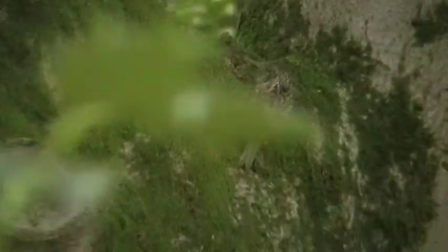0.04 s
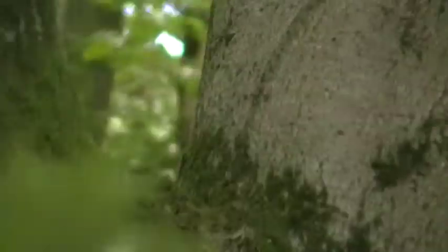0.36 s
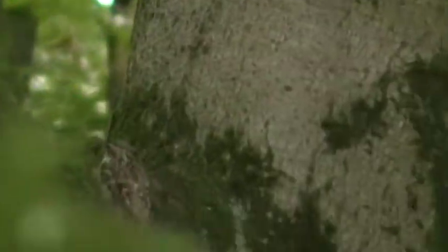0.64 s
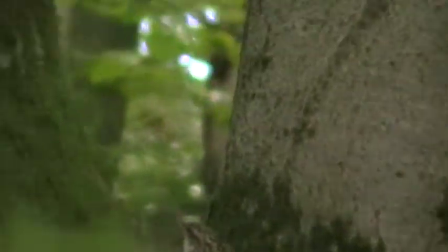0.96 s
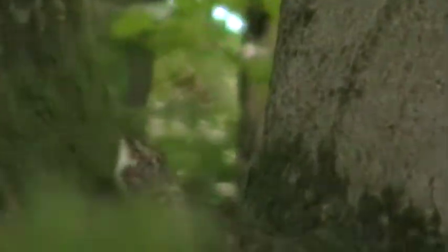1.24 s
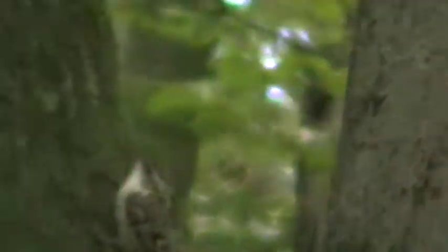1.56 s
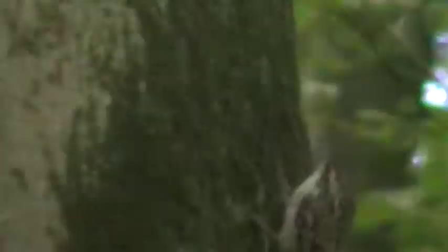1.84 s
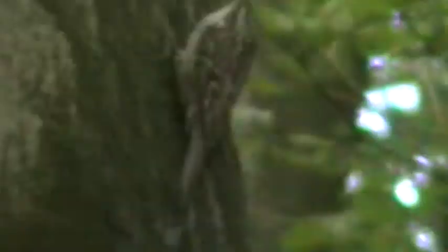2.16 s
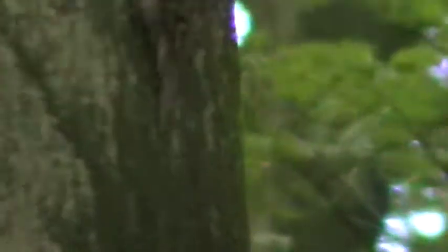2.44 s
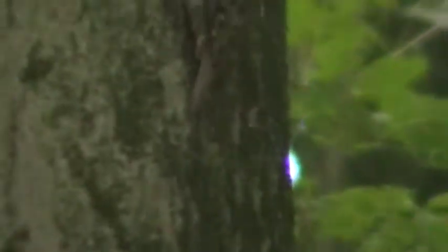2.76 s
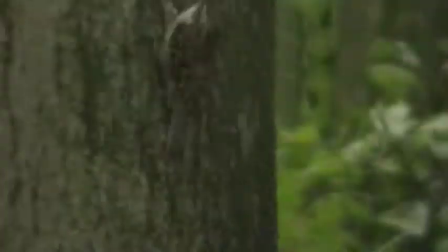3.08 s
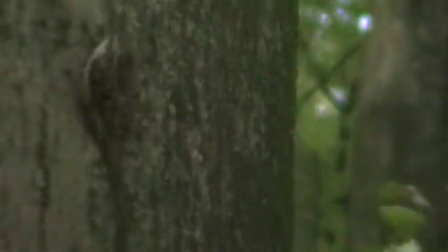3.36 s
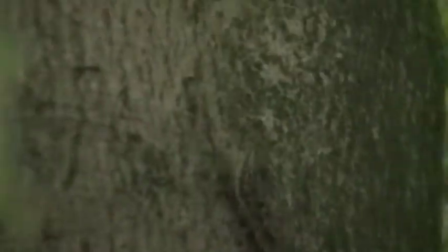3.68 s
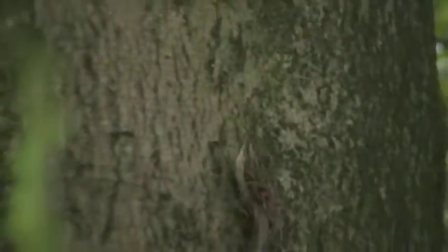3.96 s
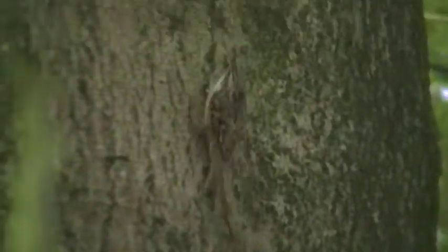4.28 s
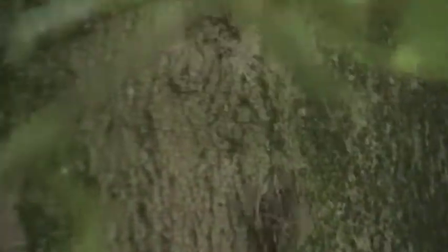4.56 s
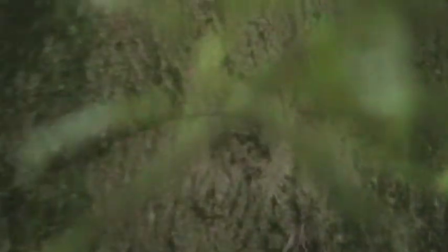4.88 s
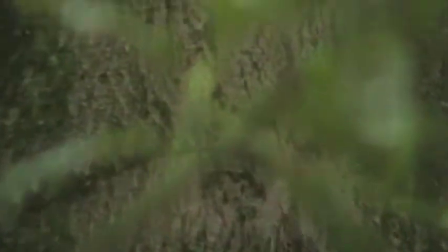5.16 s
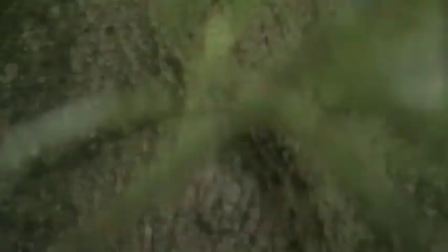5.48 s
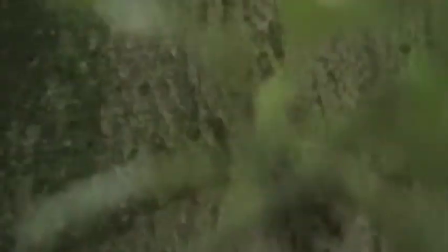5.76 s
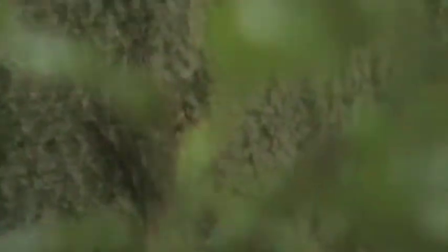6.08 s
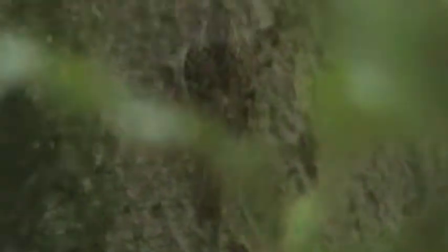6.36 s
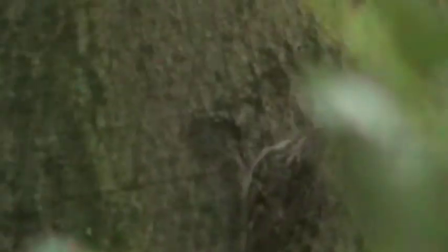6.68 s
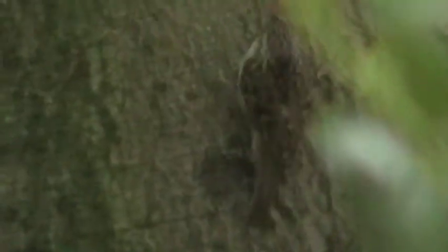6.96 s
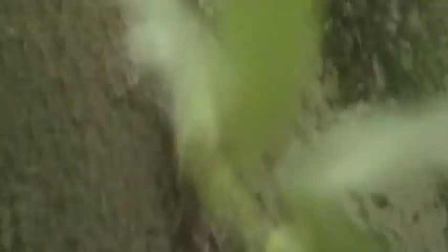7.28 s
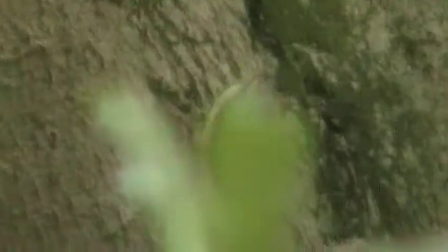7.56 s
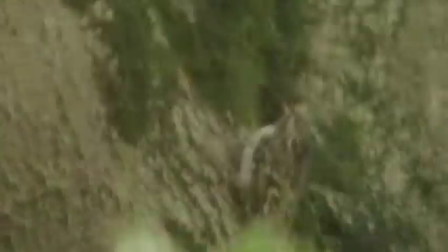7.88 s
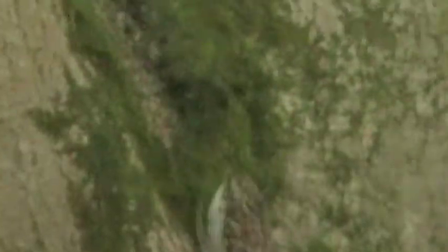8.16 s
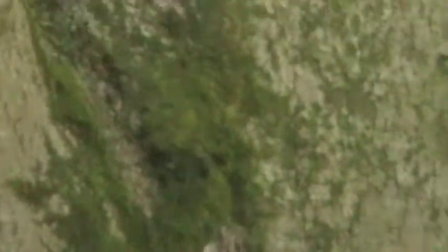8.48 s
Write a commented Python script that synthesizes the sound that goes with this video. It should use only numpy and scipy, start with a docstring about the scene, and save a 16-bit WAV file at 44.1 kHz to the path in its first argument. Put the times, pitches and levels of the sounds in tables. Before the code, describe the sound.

Plastic clicks from a hand-held camera and two short, high, warbling treecreeper calls sound over quiet woodland hiss.

```python
"""A wood: a treecreeper climbs a trunk and gives two thin, warbling calls near 7 kHz.
Trunks throw each call back and foliage smears it into a tail, over a distant rumble, a brief far tone,
steady hiss and settling leaves. A hand-held camera hums faintly; fingers rub and knock it,
and its plastic case clicks, ringing in its modes. A brief rasp leads into each loud snap."""
import sys
import numpy as np
from scipy import signal
from scipy.fft import rfft, irfft
from scipy.io import wavfile
from scipy.ndimage import uniform_filter1d

SR = 44100
rng = np.random.default_rng(int(sys.argv[2]) if len(sys.argv) > 2 else 0)


def transcribe(signal):
    """Save signal, clipped to [-1, 1], as a 16-bit WAV file at the path in sys.argv[1]."""
    frames = np.atleast_2d(signal).T
    limited = np.clip(frames, -1, 1)
    pcm = np.round(limited * 32767).astype(np.int16)
    wavfile.write(sys.argv[1], SR, pcm)


N = 380583


def whistle(length_s, base_hz, climb_hz_per_s, arch_hz, level_db, peak_s, fall_db,
            arch_s=0.042, shrink_s=0.112, attack_s=0.0035, release_s=0.0092, overtone_db=-41):
    """Syrinx: near-pure tone in shrinking pitch arches; complex, so each path can turn its phase."""
    t = np.arange(0, length_s, 1 / SR)
    angle = np.pi * t / arch_s
    arch = np.abs(np.sin(angle))
    head_start_hz = 800 * np.exp(-t / 0.00754)  # first arch starts part-way up
    pitch_hz = base_hz + climb_hz_per_s * t + arch_hz * np.exp(-t / shrink_s) * arch + head_start_hz
    tone = np.exp(2j * np.pi * np.cumsum(uniform_filter1d(pitch_hz, size=120)) / SR)
    swell_db = np.interp(t, [0, peak_s, length_s], [-9.5, 0, fall_db])
    warble_db = -3.5 * (1 - arch) - 3 * np.sin(2 * angle)  # dips between arches, louder on falling sides
    gate = np.minimum(t / attack_s, 1) * np.minimum((length_s - t) / release_s, 1)
    return np.sqrt(2) * gate * amp(level_db + swell_db + warble_db) * (tone + amp(overtone_db) * tone ** 2)


def treecreeper(call, echoes, direct_db, scatter_db, scatter, lead_rad=0.33, rough=0.3, bark_s=0.0023):
    """One call arrives directly, off the rough bark of single trunks, and through the foliage."""
    start_s, tone, out = call[0], whistle(*call[1:]), np.zeros((2, N))
    mics = np.exp(1j * np.array([[lead_rad], [0]]))  # left is reached sooner
    add(out, start_s, amp(direct_db) * panned(0.8) * (mics * tone).real)
    t = np.arange(SR // 50) / SR
    for delay_s, db, balance_db in echoes:
        smear = rng.standard_normal(len(t)) * np.exp(-t / bark_s)
        trunk = rough * smear / np.linalg.norm(smear) + (t == 0)
        echo = (mics * signal.fftconvolve(tone, trunk)).real
        add(out, start_s + delay_s, amp(db) * panned(balance_db) * echo)
    add(out, start_s, amp(scatter_db) * signal.fftconvolve(tone.real[None], scatter, axes=1))
    return out


def foliage(build_s, hold_s, t60_s, late_db, late_t60_s, spread):
    """Impulse response: scatter off leaves and twigs builds, holds and dies; the deeper wood adds a tail."""
    t = np.arange(SR) / SR
    near = np.minimum(t / build_s, 1) * amp(-60 * np.maximum(t - hold_s, 0) / t60_s)
    far = amp(late_db - 60 * t / late_t60_s) * np.minimum(t / hold_s, 1)
    ahead, around, deep = rng.standard_normal((3, 2, SR))
    return (near * (ahead[0] + spread * around) + far * deep) / np.linalg.norm(near)


def case_ring(t):
    """Spectrum of the plastic case's response to one sharp tap."""
    # case modes: f/Hz, level/dB, t60/s
    modes = [(590, -28, 0.046), (950, -18, 0.009), (1223, -19, 0.021), (1690, -12, 0.0045),
             (2164, -12.5, 0.01), (2490, -11, 0.0078), (3770, -2, 0.0028), (4930, -11, 0.0063),
             (5700, -13, 0.0037), (7640, -8.5, 0.0024), (8760, -11, 0.0037), (11100, -15.5, 0.005),
             (12370, -27, 0.0054), (13100, -18, .004)]
    return rfft(sum(amp(db - 60 * t / t60_s) * np.sin(2 * np.pi * hz * t) * (-1) ** k
                    for k, (hz, db, t60_s) in enumerate(modes)))


def click(at_s, db, tilt_db_per_oct, t60_s, spot_hz, spot_db, rattle=0.13, apart=0.11, lag_s=22e-6):
    """A snap and brief rattle ring the case, reaching the right mic later. Returns start/s, sound."""
    t = np.arange(2048) / SR
    f = np.fft.rfftfreq(len(t), 1 / SR)
    octaves = np.log2(np.maximum(f, 700))
    mics = np.exp(-2j * np.pi * f * np.array([[0], [lag_s]]))
    mid, side = rng.standard_normal((2, len(t))) * amp(-60 * t / t60_s)
    force = (t == 0) + rattle * mid + apart * np.array([side, -side])
    spot_band = np.exp(-((octaves - np.log2(spot_hz)) / 0.28) ** 2)  # favoured by the struck spot
    colour = case_ring(t) * amp(tilt_db_per_oct * octaves + spot_db * spot_band)
    sound = np.roll(irfft(rfft(force) * colour * mics), len(t) // 2, axis=1)
    sound /= np.sqrt(np.sum(sound.mean(0) ** 2) / (SR / 1000))  # energy of 1 ms at rms 1
    return at_s - len(t) / 2 / SR, amp(db) * panned(-1.1) * sound


def case_clicks(ratchet_s=4.5398, notch_s=0.0246, notches=5):
    """Fingers click the case, a control ratchets through even notches, and a few thin ticks sound."""
    # case clicks: t/s, level/dB, rattle t60/s, spot f/Hz, spot gain/dB
    clicks = [(1.6841, -23, 0.011, 3970, 5), (2.4782, -34.5, 0.0064, 2330, 14),
              (2.587, -42.5, .012, 2190, 5), (2.613, -44.5, 0.043, 3000, -2),
              (2.675, -40.5, 0.012, 2400, 2), (2.6942, -41, 0.01, 4000, 2), (3.9758, -35, 0.016, 2940, 9.5),
              (4.004, -44, .008, 2410, 5), (5.9730, -45, 0.031, 2200, 3), (6.0087, -34, 0.025, 2980, 8),
              (6.016, -24, 0.009, 3900, 10.5)]
    # high ticks: t/s, level/dB
    ticks = [(1.440, -59), (6.552, -57), (6.970, -58)]
    out = np.zeros((2, N))
    for at_s, db, t60_s, spot_hz, spot_db in clicks:
        tilt_db_per_oct = 0.2 * (db + 25)  # harder is brighter
        add(out, *click(at_s, db, tilt_db_per_oct, t60_s, spot_hz, spot_db))
    for notch in range(notches):
        at_s = ratchet_s + notch * notch_s
        add(out, *click(at_s, db=-50.5, tilt_db_per_oct=-2, t60_s=0.008, spot_hz=2250, spot_db=8))
    for at_s, db in ticks:
        add(out, *click(at_s, db, tilt_db_per_oct=7, t60_s=0.02, spot_hz=9500, spot_db=10))
    return out


def snap_lead_in(lowpass_hz=2500):
    """A brief rasp of noise swells into each loud snap."""
    # lead-ins: snap t/s, final level/dB, build-up/s
    lead_ins = [(1.6855, -38.5, 0.0091), (6.0152, -38.5, 0.0058)]
    t, out = np.arange(2048) / SR, np.zeros((2, N))
    colour = case_ring(t) / (1 + 1j * np.fft.rfftfreq(len(t), 1 / SR) / lowpass_hz)
    for snap_s, db, build_s in lead_ins:
        white = rng.standard_normal(len(t)) + 0.5 * rng.standard_normal((2, len(t)))
        rasp = unit(irfft(rfft(white) * colour))
        add(out, snap_s - t[-1], amp(db) * rasp * np.exp(-t[::-1] / build_s))
    return out


def finger_rub():
    """A finger slides on the case just before the first snap."""
    return noise_burst(start_s=1.625, length_s=0.056, band=wavering(hz=2400, width_hz=600), db=-61)


def grip_knocks(t60_s=0.014):
    """Soft blows rock the camera, pushing the two mics in opposite ways."""
    # finger knocks on the grip: t/s, level/dB, f/Hz
    knocks = [(.4895, -36.5, 664), (1.2805, -35, 680), (2.4785, -44, 780), (3.151, -46, 620),
              (3.801, -45, 620), (6.0164, -38, 453)]
    t, out = np.arange(2048) / SR, np.zeros((2, N))
    mics = np.array([[-0.48], [2]])
    for at_s, db, hz in knocks:
        add(out, at_s, mics * amp(db - 60 * t / t60_s) * np.sin(2 * np.pi * hz * t))
    return out


def distant_rumble(deep_db=-57.5, growth_db_per_s=0.42, swell_db=1.6, upper_db=-54, split_hz=200):
    """Far rumble; its deepest part wavers and slowly grows."""
    # rumble spectrum, mid: f/Hz, relative density/dB
    mid = [(12, -56), (20, -17), (38, -16), (63, -7), (112, -1), (168, -1.5), (194, -4.5), (233, -3),
           (337, -8), (376, -8), (427, -11), (714, -12), (768, -14.5), (1190, -18.5), (1600, -32.5),
           (2080, -26.5), (3520, -120)]
    # rumble spectrum, side: f/Hz, relative density/dB
    side = [(12, -61), (20, -33), (93, -2.5), (140, -1.5), (187, -2.5), (302, -3.5), (337, -4), (435, -4.5),
            (594, -6), (768, -7), (1600, -19), (2080, -40), (3520, -120)]
    t = np.arange(N) / SR
    rumble = stereo(noise(mid), noise(side), spread=amp(-2))
    deep = signal.sosfiltfilt(signal.butter(2, split_hz, fs=SR, output="sos"), rumble)
    drift_db = growth_db_per_s * (t - t.mean()) + swell_db * swell(slow_hz=0.835, fast_hz=7.6)
    return panned(-1.35) * (amp(deep_db + drift_db) * deep + amp(upper_db) * (rumble - deep))


def hiss(db=-64.5):
    """Fine, steady, wide hiss."""
    # hiss spectrum, mid: f/Hz, relative density/dB
    mid = [(820, -29), (1400, 1), (1610, -0.5), (1750, 0), (1920, -1), (2260, -1.5), (2860, -2.5),
           (3200, -2.5), (4430, -5.5), (4760, -6.5), (8160, -10), (14300, -27.5), (16000, -22)]
    # hiss spectrum, side: f/Hz, relative density/dB
    side = [(820, -10), (1400, 0.5), (5720, -13), (7450, -15.5), (9130, -9.5), (11700, -23), (15200, -30),
            (16000, -32)]
    return panned(-1.14) * amp(db) * stereo(noise(mid), noise(side), spread=1)


def leaves(start_db=-62, settle_db_per_s=1.18, calm_s=6.5, stir_at_s=6.42, stir_s=0.16, stir_db=4):
    """Leaves settle as the breeze dies, stirring once more."""
    # leaf wash spectrum: f/Hz, relative density/dB
    wash = [(800, -26), (1500, -2), (2500, -2), (4000, -0.5), (6000, -1), (8200, -2), (10000, -7.5),
            (12000, -20.5), (15000, -30)]
    t = np.arange(N) / SR
    stir = np.exp(-((t - stir_at_s) / stir_s) ** 2)
    level_db = start_db - settle_db_per_s * np.minimum(t, calm_s) + stir_db * stir
    return panned(-1.14) * amp(level_db) * stereo(noise(wash), noise(wash), spread=0.35)


def deep_rumble(db=-71, end_s=2.6, fade_s=0.54):
    """A very deep rumble lingers, then fades."""
    fade = np.clip((end_s - np.arange(N) / SR) / fade_s, 0, 1)
    return amp(db) * wavering(hz=48, width_hz=16) * fade


def far_tone(start_s=1.4, length_s=0.24):
    """A faint, low tone sounds briefly far off."""
    tone = unit(wavering(hz=655, width_hz=8)[:round(length_s * SR)])
    return noise_burst(start_s, length_s, tone, db=-67)


def camera_hum(drone_hz=238, width_hz=26, trim_db=-5.5):
    """The camera's works give a low, swelling drone and faint lines."""
    # drone contour: t/s, level before trim/dB
    contour = [(0, -61), (.5, -55.5), (1.25, -69), (1.7, -53.5), (2.0, -51), (2.2, -62), (3.35, -55.5),
               (4.0, -58), (5.15, -55.5), (5.6, -57.5), (6.9, -56.5), (7.4, -60.5), (7.9, -54.5),
               (8.63, -58)]
    # hum and whine lines: f/Hz, level/dB, half-width/Hz
    hum_lines = [(730, -73.5, 2.4), (1247, -80.5, 2.2), (2203, -81.5, 9.7), (15624, -100, 2.2)]
    drone = stereo(wavering(drone_hz, width_hz), wavering(drone_hz, width_hz), spread=0.37)
    contour_db = np.interp(np.arange(N) / SR, *np.transpose(contour))
    level_db = trim_db + contour_db + swell(slow_hz=1.5, fast_hz=5)
    lines = sum(amp(db) * wavering(hz, line_width_hz) for hz, db, line_width_hz in hum_lines)
    return panned(-1.2) * (amp(level_db) * drone + lines)


def noise(spectrum):
    """Gaussian noise of rms 1, shaped by rows of f/Hz, level/dB."""
    hz, db = np.transpose(spectrum)
    gain = amp(np.interp(np.log(np.fft.rfftfreq(N, 1 / SR) + 1), np.log(hz + 1), db))
    return unit(irfft(rfft(rng.standard_normal(N)) * gain, N))


def wavering(hz, width_hz):
    """Noise band of rms 1: a line that wanders in level and phase."""
    f = np.fft.rfftfreq(N, 1 / SR)
    return unit(irfft(rfft(rng.standard_normal(N)) / (1 + ((f - hz) / width_hz) ** 2), N))


def noise_burst(start_s, length_s, band, db):
    """Soft-edged burst of a noise band, slightly right of centre."""
    out, count = np.zeros((2, N)), round(length_s * SR)
    add(out, start_s, panned(-1) * amp(db) * band[:count] * signal.windows.tukey(count, 0.4))
    return out


def swell(slow_hz, fast_hz):
    """Random drift of rms 1 between two rates."""
    t = np.arange(0, N + 256, 256) / SR
    rates_hz = np.geomspace(slow_hz, fast_hz, num=24)
    drift = sum(np.sin(2 * np.pi * (hz * t + rng.random())) / np.sqrt(hz) for hz in rates_hz)
    return np.interp(np.arange(N) / SR, t, unit(drift))


def amp(db):
    """Decibels to gain."""
    return 10 ** (np.asarray(db) / 20)


def unit(x):
    """Scales to rms 1."""
    return x / np.sqrt(np.mean(x ** 2) + 1e-20)


def add(mix, at_s, sound):
    """Mixes in a stereo sound."""
    part = mix[:, max(round(at_s * SR), 0):][:, :sound.shape[1]]
    part += sound[:, :part.shape[1]]


def panned(balance_db):
    """Channel gains for a left-minus-right level."""
    return amp([[balance_db / 2], [-balance_db / 2]])


def stereo(mid, side, spread):
    """Mid and side to left and right."""
    return mid + spread * np.array([[1], [-1]]) * side


def scene():
    """First call in the open; second screened, so its reflections outweigh the direct sound."""
    # calls: t/s, length/s, base f/Hz, climb/(Hz/s), arch height/Hz, source level/dB, peak t/s, fall/dB
    calls = [(2.4885, 0.15, 6694, 2500, 1090, -30, 0.061, -15.5),
             (7.8495, 0.145, 6480, 4100, 1230, -30, 0.118, -7)]
    # trunk echoes, first call: delay/s, gain/dB, left-right/dB
    first_echoes = [(0.022, -28, 2), (.046, -28, 4), (0.059, -14, -1), (0.084, -17, 0), (.121, -15, 5),
                    (.172, -22.5, -2), (0.199, -25, -4)]
    # trunk echoes, second call: delay/s, gain/dB, left-right/dB
    second_echoes = [(.010, -13, 0), (.036, -22, 0), (.052, -18, 0.92), (.083, -18.5, 1), (.104, -23, 1),
                     (0.139, -35, 1)]
    scatter = foliage(build_s=0.031, hold_s=0.11, t60_s=0.25, late_db=-0.5, late_t60_s=0.95, spread=0.29)
    first = treecreeper(calls[0], first_echoes, direct_db=0, scatter_db=-9, scatter=scatter)
    scatter = foliage(build_s=0.017, hold_s=0.035, t60_s=0.47, late_db=-12, late_t60_s=1, spread=0.22)
    second = treecreeper(calls[1], second_echoes, direct_db=-11, scatter_db=-10.5, scatter=scatter)
    close_sounds = case_clicks() + snap_lead_in() + finger_rub() + grip_knocks()
    background = distant_rumble() + hiss() + leaves() + deep_rumble() + far_tone() + camera_hum()
    return first + second + close_sounds + background


def record(dry):
    """Band limit at 15.8 kHz."""
    lowpass = signal.firwin(511, 15800, window=("kaiser", 9), fs=SR)
    return signal.oaconvolve(dry, lowpass[None], "same")


dry = scene()
out = record(dry)
transcribe(out)
```